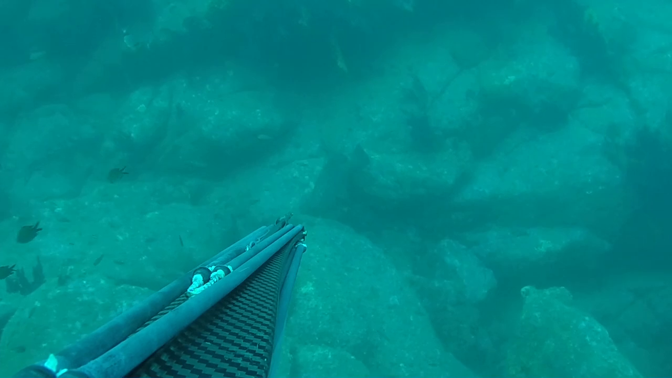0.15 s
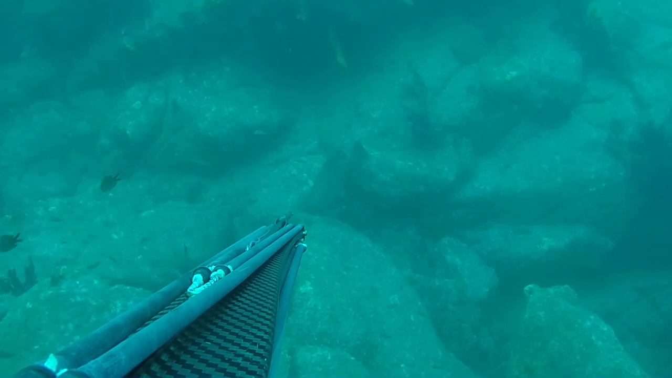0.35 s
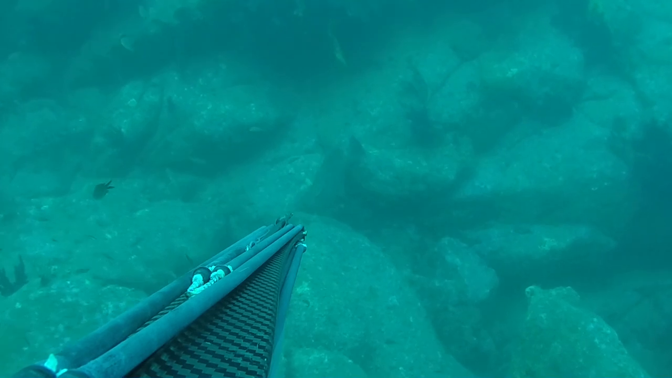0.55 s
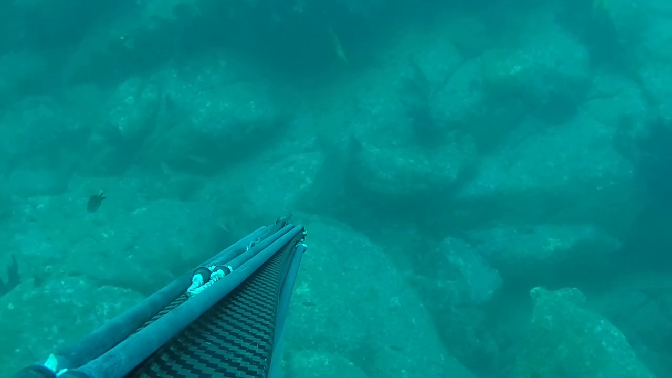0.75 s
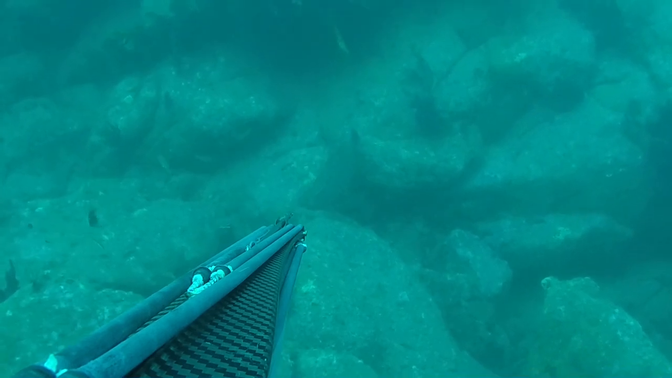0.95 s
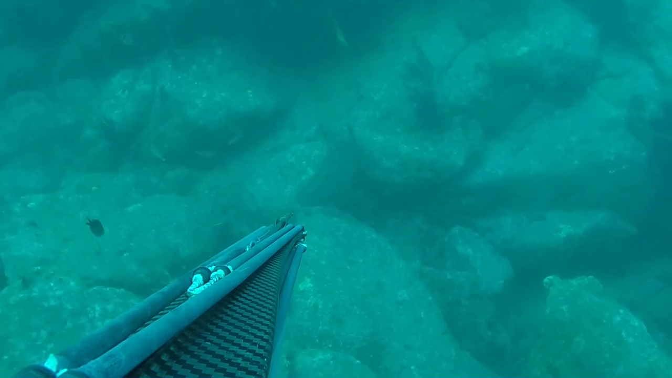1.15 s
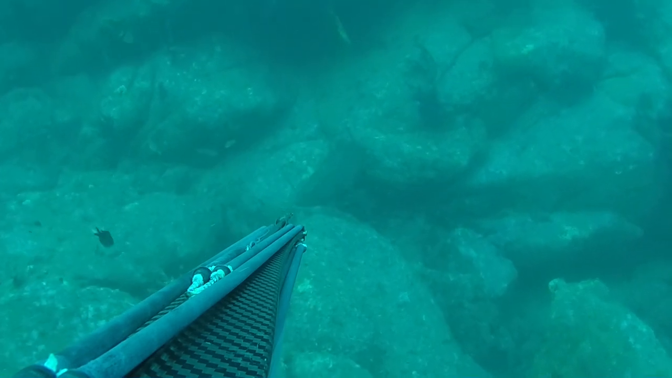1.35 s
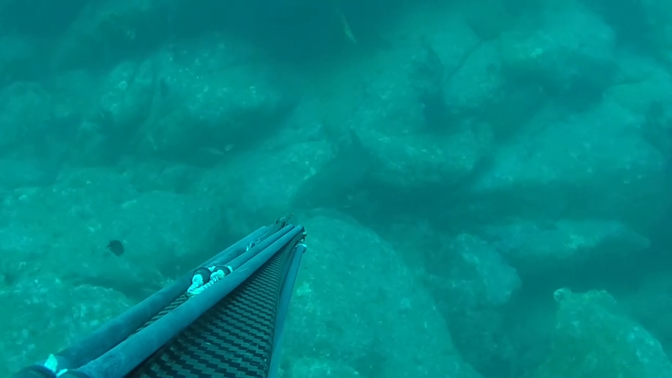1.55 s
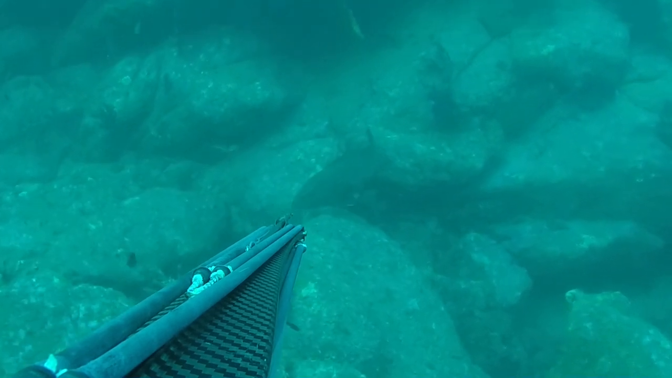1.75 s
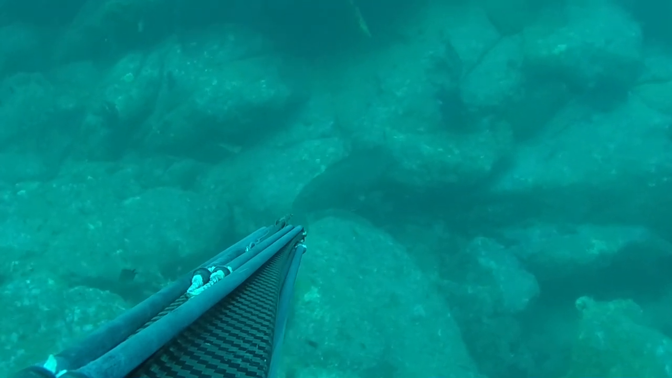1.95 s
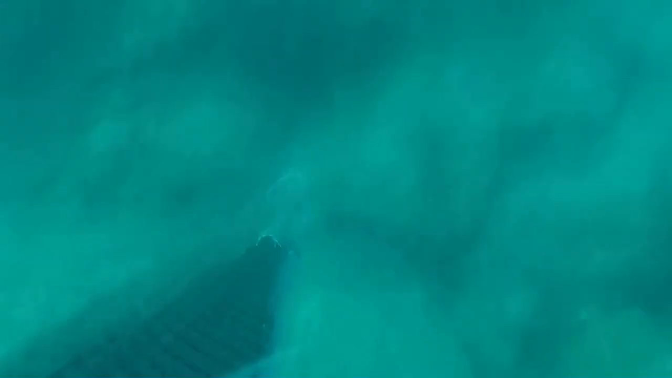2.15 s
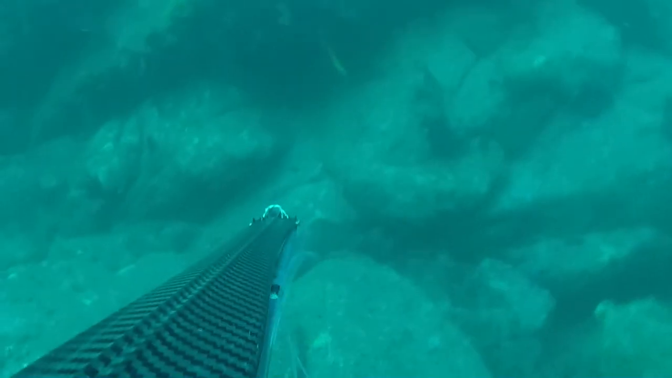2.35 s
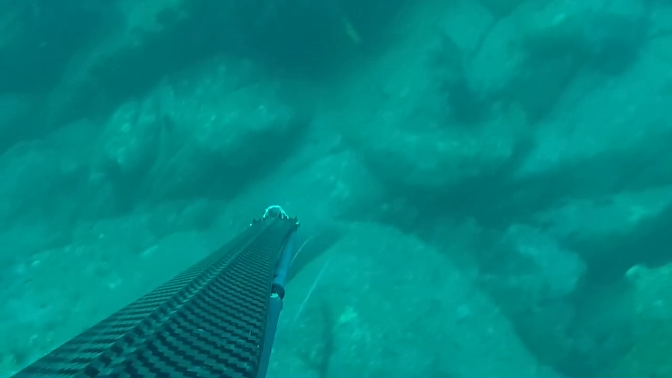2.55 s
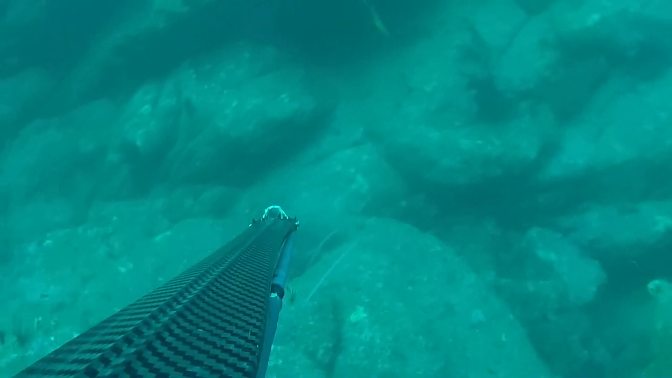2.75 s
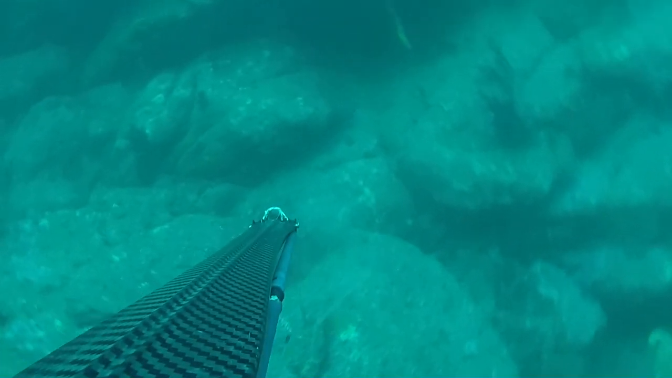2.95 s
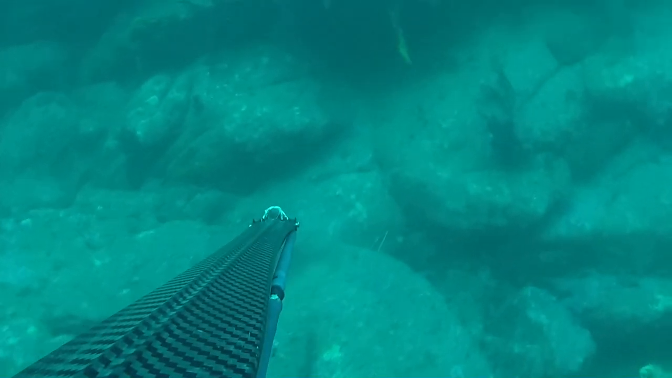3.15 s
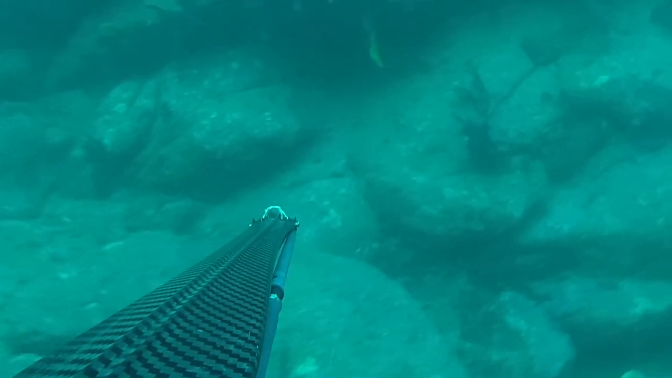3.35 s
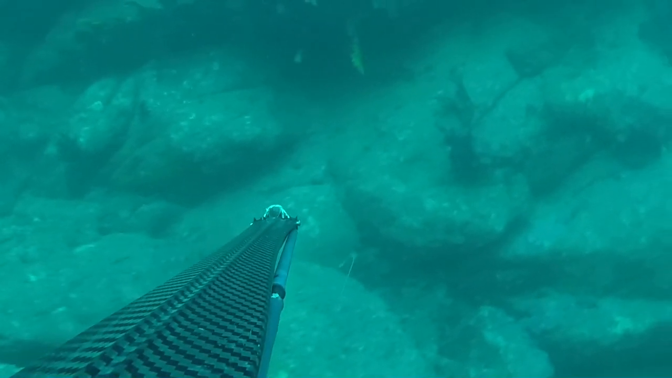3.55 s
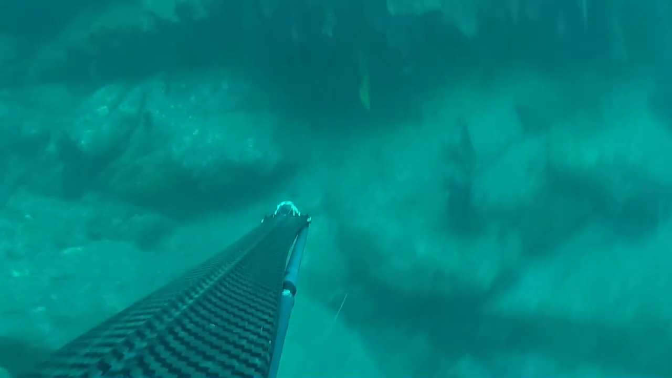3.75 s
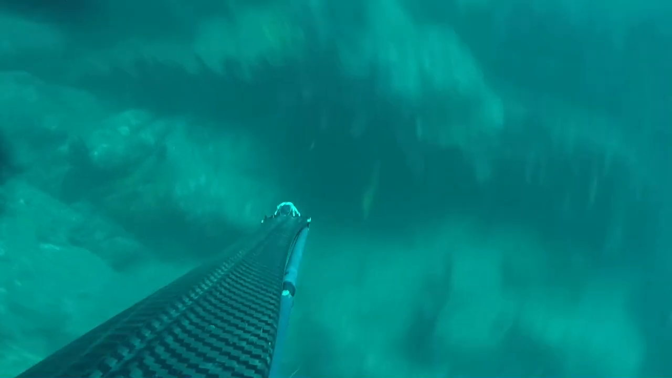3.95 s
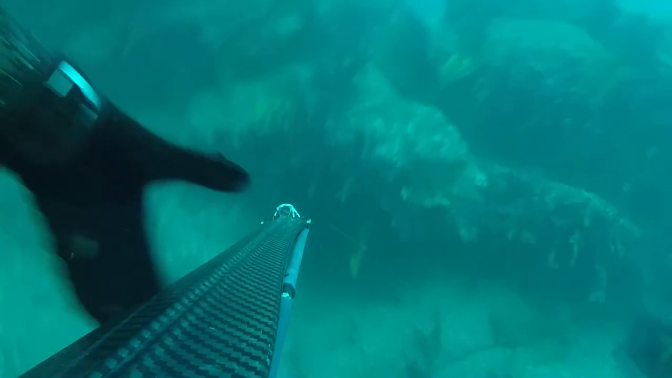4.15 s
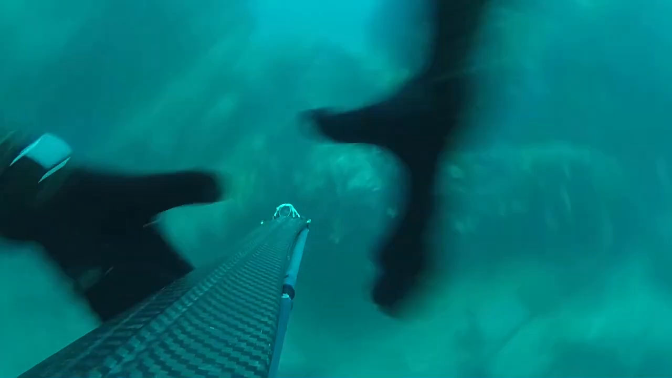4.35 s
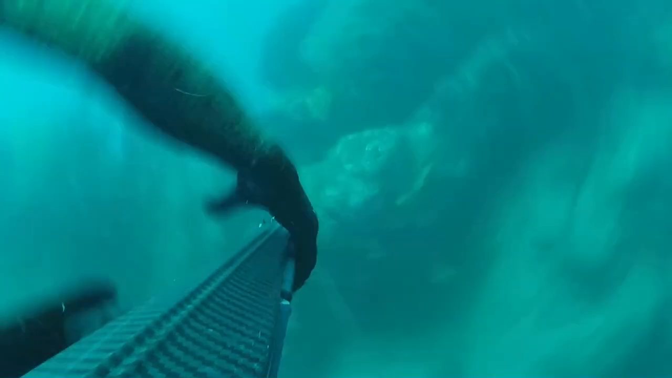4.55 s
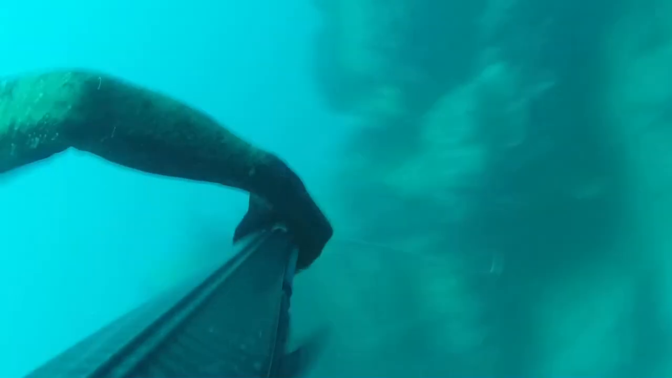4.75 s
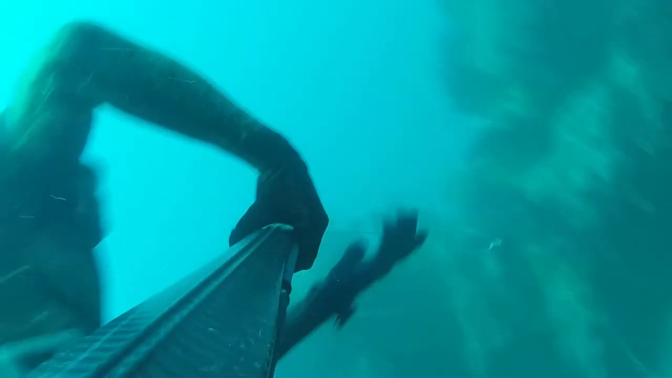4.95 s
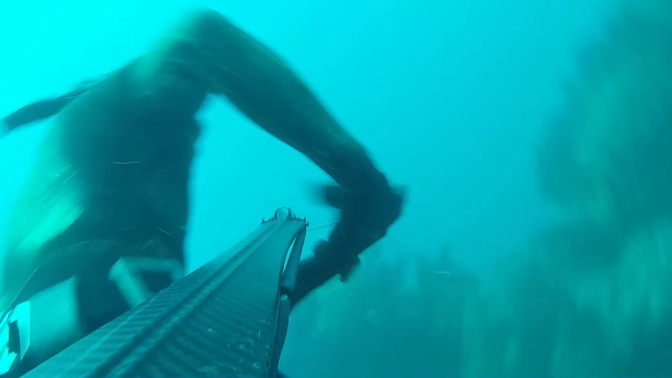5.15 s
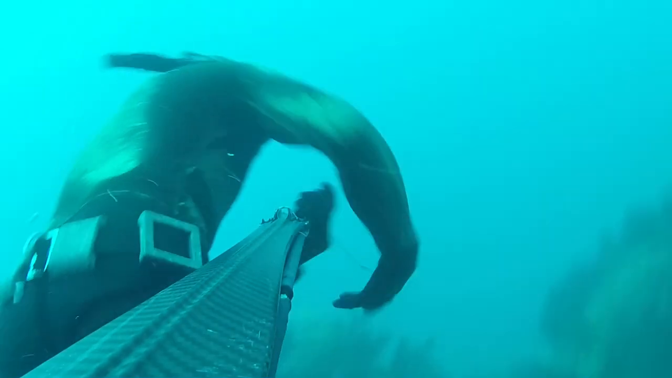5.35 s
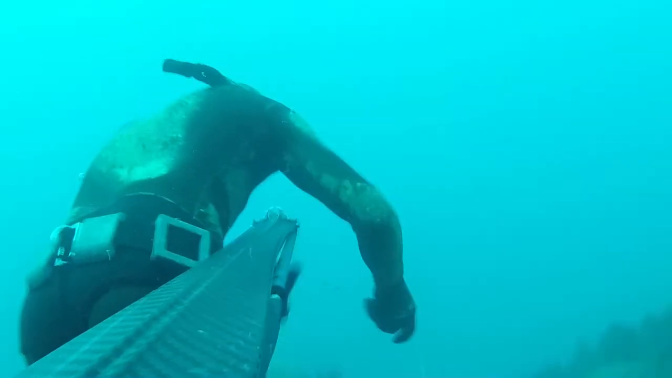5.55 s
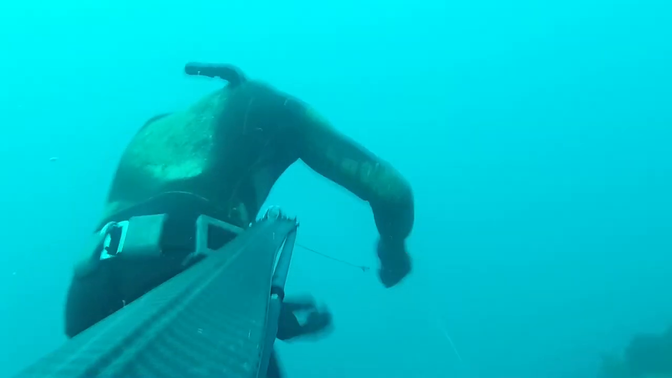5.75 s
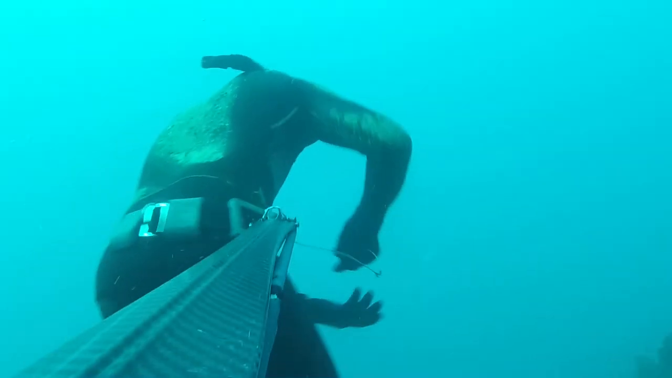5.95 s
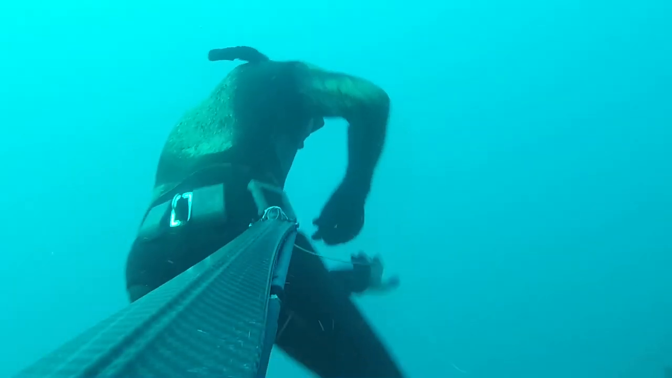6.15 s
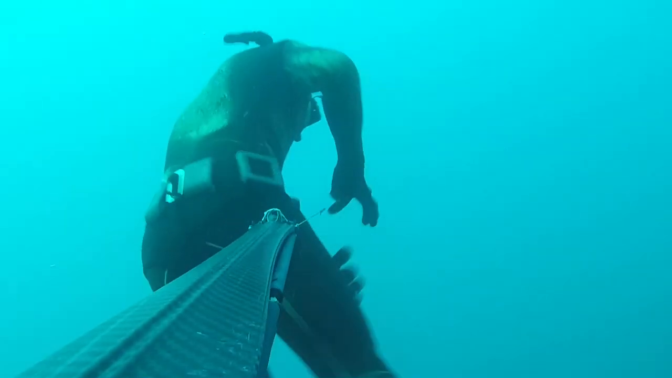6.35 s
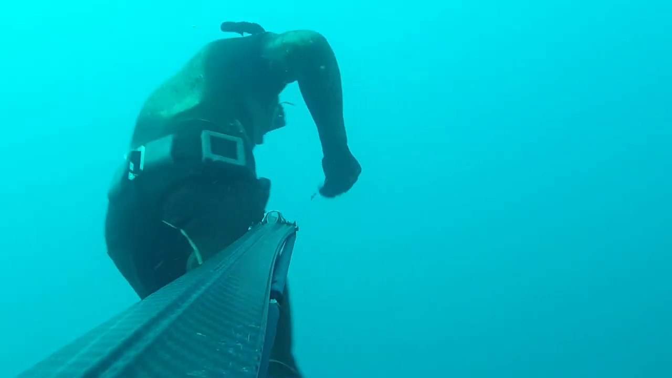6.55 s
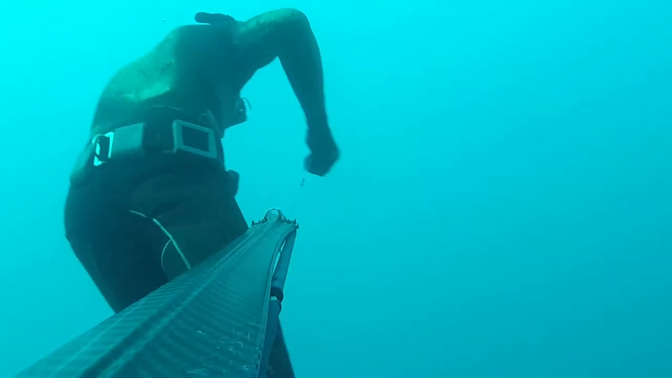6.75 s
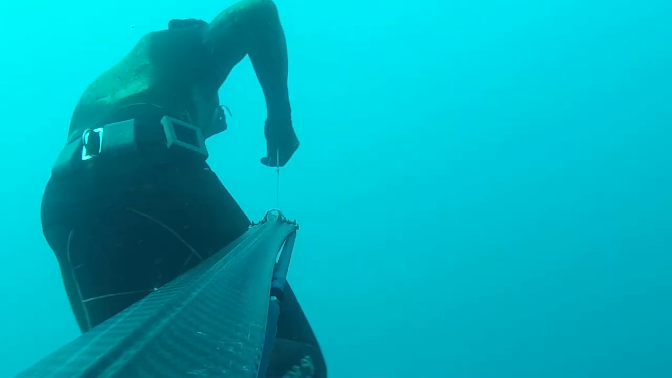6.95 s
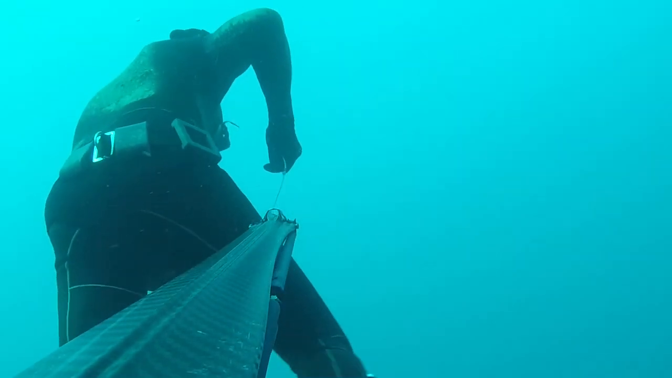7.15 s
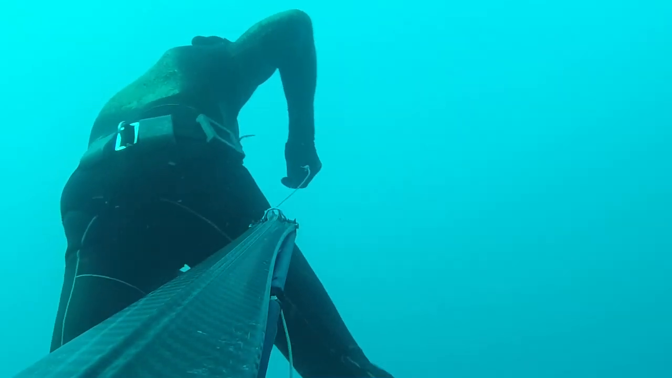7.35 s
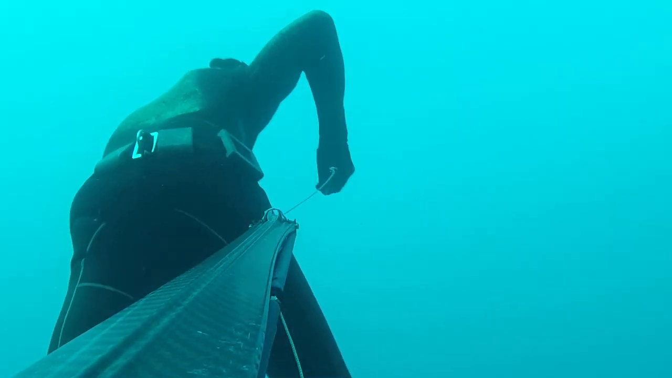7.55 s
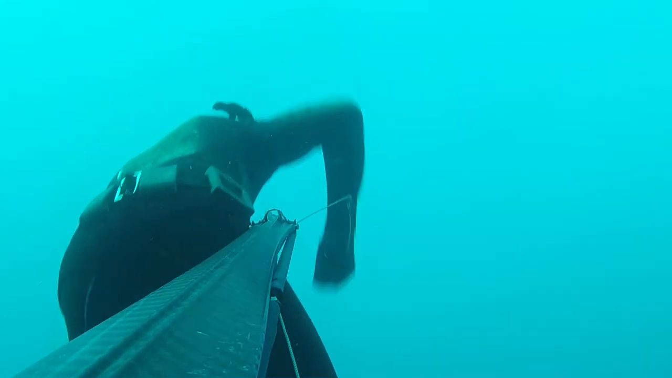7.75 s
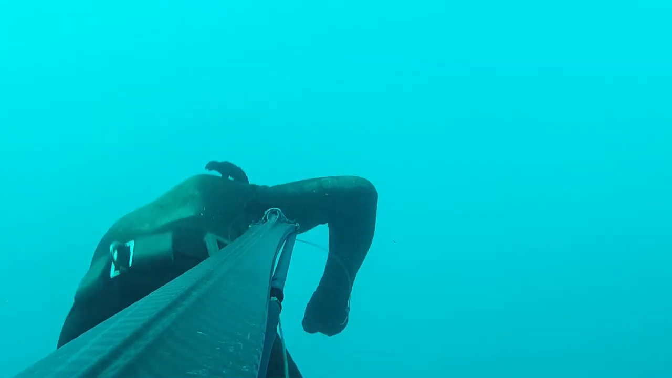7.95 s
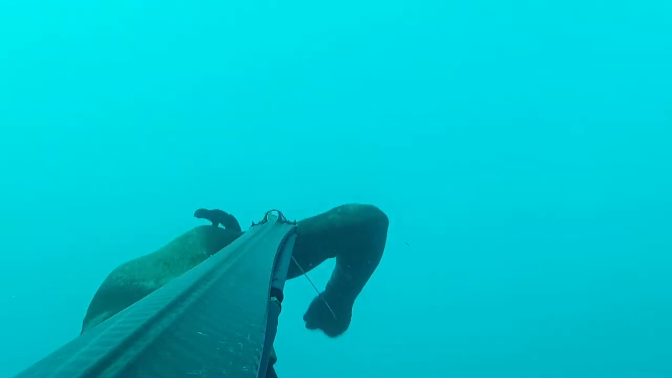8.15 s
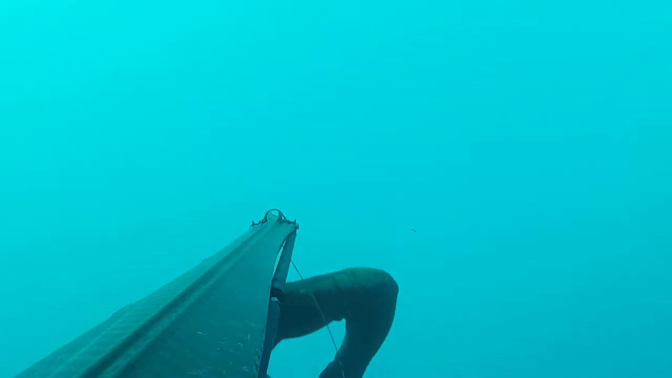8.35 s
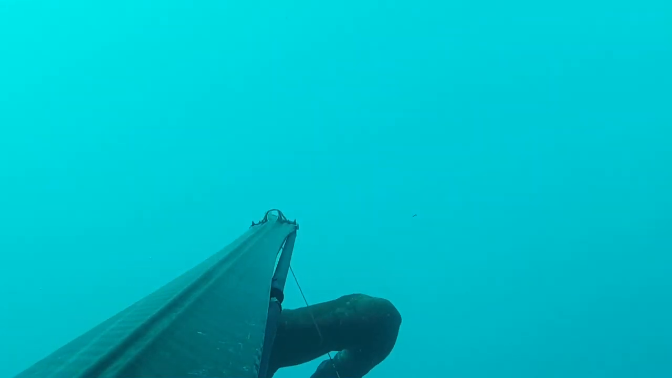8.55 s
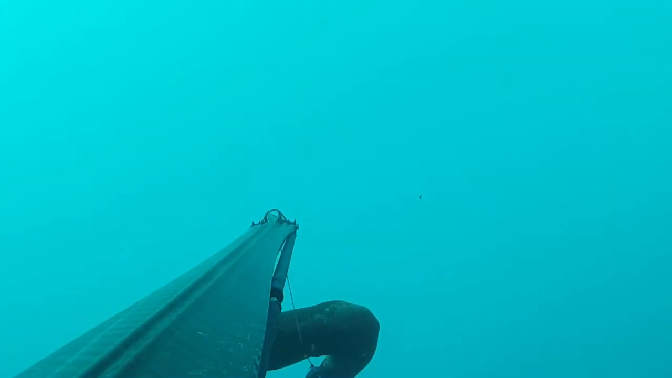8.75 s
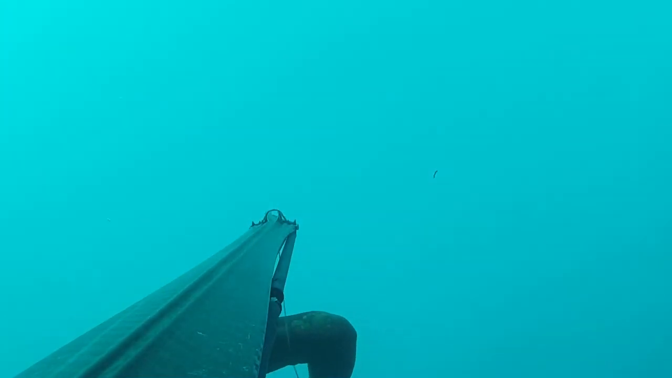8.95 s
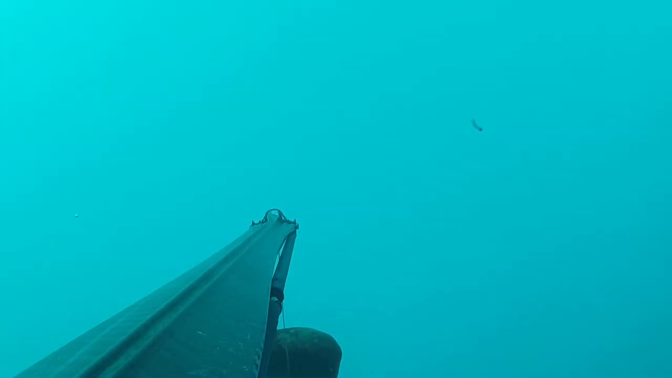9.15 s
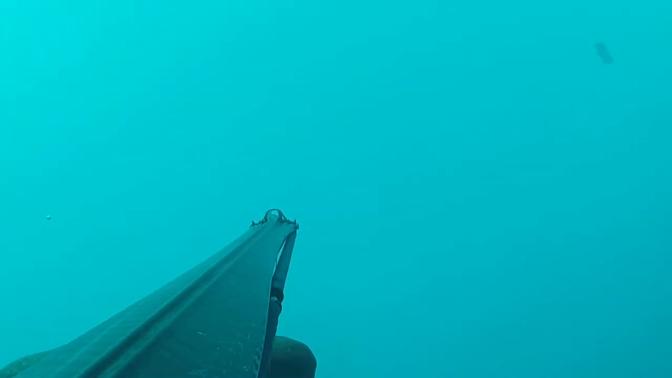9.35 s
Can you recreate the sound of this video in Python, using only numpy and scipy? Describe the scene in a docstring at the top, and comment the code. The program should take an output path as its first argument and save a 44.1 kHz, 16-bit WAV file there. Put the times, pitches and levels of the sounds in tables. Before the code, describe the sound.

Snapping shrimp tick over a dim sea; a sudden loud hard rattle of a speargun shot, then handling bumps, squeaks and watery rumbles.

```python
"""First the sea: hiss and far crackle, with snapping shrimp close by, over a rocky bottom. Then a speargun fires.
A microphone rides the gun in a camera's sealed housing. Trigger, shaft and line rattle the barrel; then hands
and reel line knock, rub, squeak and ratchet on it while it sways in the water. Blows and rubbing are noise
ringing resonances of barrel and housing; low wobbles and squeaks are short gliding sines. Gain control ducks
the far sea after loud near sounds."""
import sys
import numpy as np
from scipy import signal
from scipy.fft import rfft, irfft
from scipy.io import wavfile
from scipy.ndimage import uniform_filter1d

SR = 44100
rng = np.random.default_rng(int(sys.argv[2]) if len(sys.argv) > 2 else 0)


def inscribe(sig):
    """Save sig as 16-bit PCM at rate SR to the path in sys.argv[1].

    A 1-D sig is mono; a 2-D sig holds one channel per row.
    Samples are clipped to [-1, 1] before scaling.
    """
    pcm = np.round(np.clip(np.atleast_2d(sig).T, -1, 1) * 32767)
    wavfile.write(sys.argv[1], SR, pcm.astype(np.int16))


N = 414099
TIME = np.arange(N) / SR  # s

# Far sea, colour of hiss and crackle: (f/Hz, relative level/dB)
SEA_COLOUR = [(35, -54), (60, -3.5), (230, -6), (450, -9.5), (1000, -15), (1620, -18.5), (2100, -17.5),
              (2720, -21.5), (3590, -14.5), (5000, -25.5), (6000, -17.5), (7500, -23.5), (9400, -27.5),
              (10600, -35), (12000, -29.5), (14600, -37), (16000, -42.5)]
SEA_DB = -56.5  # rms before ducking

# Slow water pressure on housing and mount: (t/s, surge level/dB, mount level/dB)
SWAY = [(0.0, -79, -64), (0.15, -66.5, -68), (1.96, -60.5, -63), (2.07, -33.5, -47), (2.25, -35, -36.5),
        (2.32, -56.5, -46), (2.77, -67, -62), (3.61, -59.5, -55), (3.71, -37, -51), (4.24, -63.5, -63),
        (4.55, -52, -45), (4.92, -32.5, -48), (5.0, -47.5, -43.5), (5.46, -57, -52.5), (5.75, -33.5, -48.5),
        (6.04, -54.5, -67), (6.3, -62, -58), (6.59, -48.5, -62), (7.11, -64.5, -66), (8.18, -67, -63),
        (8.34, -45, -60), (8.86, -66.5, -66), (9.26, -49.5, -51.5), (9.39, -59, -59)]
# Flow bending the barrel: (t/s, level/dB)
FLOW = [(0.0, -67), (1.7, -69.5), (2.07, -67), (2.19, -59.5), (2.48, -67), (2.77, -61), (3.32, -53.5),
        (3.79, -47.5), (4.03, -58), (4.18, -62), (4.97, -42.5), (5.28, -50.5), (5.75, -50.5), (5.93, -59),
        (6.33, -50), (6.49, -58.5), (7.24, -53), (7.61, -59), (7.95, -54), (8.71, -60), (9.1, -55.5),
        (9.39, -58.5)]
GUST_DB = 2  # unevenness of the flow
BEND_DB = -5.5  # barrel bending against the thud of a stroke

# Shrimp snapping near the microphone: (t/s, peak clack level/dB, peak tick level/dB)
NEAR_SNAPS = [(0.0269, -50, -31.5), (0.0464, -37.5, -31.5), (0.1327, -43.0, -37), (0.4016, -55, -39),
              (0.7214, -36, -31), (0.9818, -35.5, -34), (1.1085, -49.0, -36.5), (1.2691, -39, -26.0),
              (1.7161, -43.0, -38), (1.7515, -39.5, -40), (1.8054, -42.0, -34.5), (1.8892, -51.0, -37.5),
              (2.3362, -35, -30), (2.3646, -44.0, -27.5), (2.3691, -37, -35), (3.0825, -45, -30.5),
              (3.6821, -33, -24.0), (3.729, -36.0, -32), (4.1351, -49, -42.5), (4.4449, -38.5, -39.5),
              (4.8954, -44.0, -39), (5.1702, -37.0, -34), (5.2042, -45, -25), (5.2431, -32.5, -32),
              (5.3444, -38, -32), (5.3548, -39, -33), (5.4536, -46.0, -32), (5.481, -34, -33.0),
              (6.0837, -39, -31.5), (6.4893, -57, -33), (6.6379, -64, -36), (6.9492, -38.5, -35),
              (7.2565, -50, -35.5), (7.2849, -39.5, -36.5), (7.7239, -42.0, -34), (7.8751, -49.0, -39.0),
              (8.0093, -49, -36.5), (8.3286, -52, -36.5), (8.6089, -54.0, -30), (8.7282, -41, -27),
              (9.1337, -48, -41), (9.1412, -41, -31.5), (9.255, -35.0, -35.0), (9.3772, -52, -38.5)]
FAINT_SNAPS = 16  # number, at random times
FAINT_SNAP_LOWEST_DB, FAINT_SNAP_RANGE_DB = -47, 11

# Resonances of housing and barrel, four groups, each: (f/Hz, width/Hz, relative level/dB)
BODY = [(940, 220, -0.5), (1241, 130, 2), (1355, 150, -1), (1630, 190, -1), (2005, 200, 3)]
THUD = [(303, 330, -4), (477, 135, 2.5), (805, 230, -3.5)]
CLACK = [(2227, 180, 2.5), (2552, 140, 2.5), (2748, 190, 0), (3475, 330, 1), (4350, 500, -6)]
TICK = [(5834, 670, 4.5), (6680, 860, -1.5), (6756, 200, 3), (7940, 700, -5.5), (9420, 1200, -13),
        (12470, 450, -17.5), (13700, 2000, -24)]

# Blows on barrel and housing, peak of each group; the place struck favours some body modes:
# (t/s, body level/dB, thud level/dB, clack level/dB, tick level/dB, favoured body f/Hz, contact/s)
KNOCKS = [(0.166, -58.0, -63.0, -42, -48, 1940.0, 0.0031), (0.86, -42.0, -66.0, -56, -57.0, 1700, 0.002),
          (1.4231, -29.5, -49, -35.5, -41, 1630, 0.0023), (1.6237, -42.0, -51, -45, -47, 1610, 0.0021),
          (1.6905, -49, -60, -34, -23.0, 1960.0, 0.0031), (1.8269, -32, -45.5, -39, -57.0, 1630, 0.00087),
          (2.041, -15, -26, -37, -50.0, 1810, 0.0014), (2.0463, -4, -11.5, -6.5, -10, 1410, 0.0013),
          (2.052, -19, -21, -19.0, -14.0, 1630.0, 0.00048), (2.0648, 1, -10, -2, -6, 1520, 0.0018),
          (2.068, 0, -18, -15, -3.5, 1480, 0.0011), (2.0775, -26, -43.0, -11.5, -9, 1770.0, 0.0011),
          (2.097, -20.0, -31.0, -23, -22, 1750.0, 0.0018), (2.1069, -8.0, -28, -13.5, -8.5, 1760, 0.0015),
          (2.118, -19, -20, -23, -35, 1650.0, 0.0018), (2.127, -24, -26.0, -21, -24, 1680.0, 0.0012),
          (2.1495, -24, -23, -25, -22, 1730.0, 0.00082), (2.1629, -18.0, -26, -27, -28.0, 1680.0, 0.0014),
          (2.1703, -14, -23, -15, -23, 1470.0, 0.0014), (2.193, -10.5, -29, -13, -21.5, 1480, 0.0032),
          (2.2192, -8, -19.0, -8.5, -18.0, 1890.0, 0.00062), (2.237, -19, -41, -21, -34, 1610, 0.0012),
          (2.2465, -17, -25, -16, -23, 1600.0, 0.0022), (2.2586, -5, -27, -2.0, -3.5, 1760.0, 0.0014),
          (2.273, -24, -23, -22, -25, 1580, 0.0023), (2.3833, -28.0, -31.0, -35, -56, 1850, 0.002),
          (2.4, -31.5, -55.0, -39, -44.5, 1820, 0.0023), (2.4395, -51, -60, -48, -45, 1900, 0.001),
          (2.4769, -44, -41.5, -59, -65.5, 1790.0, 0.0029), (2.57, -50, -52, -52, -55, 1592, 0.0015),
          (2.6533, -40, -56.5, -43, -40.5, 1254, 0.0033), (2.6824, -52, -56, -41, -50.5, 1285, 0.0025),
          (2.7376, -44, -63.5, -43.5, -67, 1840, 0.0015), (2.9386, -30.5, -43.5, -48, -44, 1200.0, 0.0029),
          (2.9442, -37, -51, -41, -45, 1150.0, 0.0031), (3.0224, -29.5, -29.5, -42, -58.0, 1520, 0.0026),
          (3.1924, -23.5, -25.5, -33, -60, 1600, 0.0019), (3.3866, -41.5, -44, -50, -40, 1640.0, 0.0014),
          (3.4342, -33.0, -54.0, -58, -53.0, 1080, 0.005), (3.4546, -28.0, -30, -40.0, -57, 1490, 0.0013),
          (3.5649, -43, -58, -37.5, -50, 1310, 0.002), (3.634, -40, -41, -41, -61, 1250, 0.0038),
          (3.6889, -7.0, -21, -9, -16.5, 1093, 0.0015), (3.7602, -36.5, -53.0, -46, -49, 1600.0, 0.0033),
          (3.85, -24, -51, -23, -44, 1480, 0.0017), (3.947, -40, -32.5, -38.0, -37, 1530.0, 0.0022),
          (4.013, -30, -44, -48, -41, 1280.0, 0.0015), (4.0281, -13, -32.0, 0, -6.5, 1530, 0.0014),
          (4.0365, -33, -31, -15.5, -23, 1420.0, 0.0016), (4.0417, -30.5, -38, -22, -37, 1843, 0.001),
          (4.3815, -42, -47.5, -57, -64.5, 1360.0, 0.003), (4.5711, -22, -36, -25.5, -35.5, 1430, 0.0017),
          (4.693, -28, -41.0, -29, -45, 1730.0, 0.0013), (4.7355, -13, -18.5, -10.5, -17.5, 1160, 0.0013),
          (4.7428, -14.5, -23.5, -20.5, -42, 1730, 0.0015), (4.866, -37.5, -50, -33.5, -37, 1460, 0.0036),
          (4.902, -42, -55, -34, -37, 1550.0, 0.0034), (4.9438, -36, -43.0, -27.5, -33.5, 1410, 0.0044),
          (4.9725, -43, -34, -34.5, -40, 1920.0, 0.012), (5.119, -34, -40.0, -36, -34.5, 1000, 0.0018),
          (5.3787, -35.0, -40, -48.0, -59, 1230, 0.0023), (5.491, -34, -46, -30, -30.5, 1770, 0.0064),
          (5.518, -34, -29.5, -36, -34, 1130, 0.0028), (5.6049, -29, -44.0, -38, -51, 1340.0, 0.0041),
          (5.931, -36.0, -36, -38.5, -50, 960.0, 0.0024), (6.058, -40.5, -40, -41, -67.5, 1470.0, 0.0027),
          (6.0996, -43.5, -53, -42.0, -39, 1820.0, 0.0031),
          (6.1454, -40, -42.0, -40.0, -49.0, 1260.0, 0.0023), (6.182, -37, -36, -29.5, -35, 1510.0, 0.0043),
          (6.213, -32.0, -35, -29, -29, 1830, 0.0024), (6.2566, -37, -37, -38, -48, 1960.0, 0.0029),
          (6.2807, -34.5, -33.5, -38.5, -58, 1130, 0.0043), (6.3213, -40, -45, -45, -54, 1900, 0.002),
          (6.4376, -25.0, -36.5, -46, -61.0, 1320, 0.0014), (6.5206, -42.5, -58, -40, -54, 1500, 0.002),
          (6.7063, -45, -61, -35.0, -50, 1670.0, 0.0028), (6.7762, -33.0, -39, -35.0, -53, 1980, 0.004),
          (6.8031, -35, -33, -33.5, -40.5, 1350.0, 0.006), (7.3356, -41.5, -36, -42.5, -58.5, 1195, 0.0015),
          (7.3797, -35, -32, -35, -46.0, 1130.0, 0.0023), (7.7, -35.5, -35.5, -36, -44.5, 1500.0, 0.0036),
          (7.7599, -35, -30.5, -40, -39.0, 1460.0, 0.0014), (7.895, -40, -32, -37, -36.5, 1320.0, 0.0029),
          (7.9776, -37, -32.5, -36, -36.5, 1450, 0.0031),
          (8.0486, -40, -32.0, -53.0, -54.0, 1010.0, 0.0026), (8.165, -43.0, -41, -47, -57.0, 1440, 0.0036),
          (8.267, -33.5, -33, -33.5, -52, 1600.0, 0.0021), (8.273, -29.5, -46, -37, -54, 1570, 0.0021),
          (8.3104, -38.0, -44.5, -38.5, -55, 1910.0, 0.003), (8.4852, -42.0, -66, -35.5, -65, 1960, 0.0014),
          (8.8703, -39, -47, -48, -49.5, 1290, 0.002), (8.8934, -40, -54, -34, -49.0, 1180.0, 0.0021),
          (9.01, -30.5, -29, -33, -53, 1810, 0.003)]
# Favoured clack pitch; it rises as the clack outweighs the body
CLACK_HZ, CLACK_HZ_PER_DB = 2800, 55.5
# A metal part ringing on after one clack: (f/Hz, starting level/dB, time to fall 60 dB/s)
PING = (2700, -45, 0.17)
PING_S = 4.034  # onset

# Short low wobbles of barrel and mount when nudged: (centre t/s, starting f/Hz, peak level/dB)
WOBBLES = [(0.25, 304, -50), (2.706, 115, -33.5), (3.345, 108, -35), (3.584, 113, -37.5), (3.632, 133, -35),
           (3.762, 103, -39), (3.966, 123, -33.5), (3.972, 230, -35), (4.248, 152.4, -39), (4.33, 430, -50),
           (4.537, 152, -28), (4.62, 380, -40.5), (4.587, 454, -36), (4.71, 397, -36.5), (4.719, 181, -41),
           (4.751, 245, -41), (4.835, 430, -40.5), (4.88, 423, -43), (4.886, 140.4, -30.5),
           (4.932, 405, -41), (4.979, 165, -26.5), (4.977, 255, -29.5), (5.054, 394, -34),
           (5.071, 167, -30), (5.087, 426, -29.5), (5.303, 157, -39.5), (5.348, 182, -41),
           (5.385, 162, -32.5), (5.5, 118, -34), (5.531, 233, -42.5), (5.607, 182, -34), (5.787, 146, -29),
           (5.844, 167, -28), (5.939, 166, -37), (6.133, 152, -32.5), (6.188, 230, -32),
           (6.222, 251, -32.5), (6.223, 143, -30), (6.286, 166, -34), (6.417, 413, -40), (6.425, 203, -37),
           (6.78, 158, -36), (6.812, 155, -34.5), (6.813, 240, -34.5), (6.857, 147, -32.5),
           (7.189, 219, -36.5), (7.346, 123, -43), (7.345, 245, -38.5), (7.387, 168, -31),
           (7.388, 252, -33), (7.418, 238, -30.5), (7.767, 138, -36), (7.905, 328.2, -36.5),
           (7.964, 243, -33.5), (8.169, 234, -44.5), (8.92, 334, -39), (8.925, 196, -36), (9.015, 157, -41)]
WOBBLE_S = 0.0354  # length scale

# Strokes of line and gloves along the barrel; levels during the hold:
# (t/s at full level, rise/s, hold/s, fall/s, body level/dB, thud level/dB, clack level/dB, tick level/dB,
#  favoured body f/Hz)
RUBS = [(2.048, 0.0087, .002, .025, -35.5, -22.5, -33, -50, 1489),
        (2.101, 0.048, .03, 0.045, -27, -35, -33.5, -40, 1690),
        (2.154, 0.036, .01, .04, -28.5, -34.5, -36, -36, 1670),
        (2.21, 0.041, 0.013, .05, -40.5, -36, -45, -52, 1740),
        (2.266, 0.025, .055, .05, -40.5, -44.5, -46.5, -43, 1680),
        (2.39, 0.14, .005, 0.055, -48.5, -51, -53, -60, 1764),
        (2.66, .15, .04, .05, -60.5, -73, -66.5, -75, 1220),
        (2.939, 0.055, .08, .12, -50.5, -57.5, -60, -66, 1150),
        (3.19, .14, .005, .2, -55.5, -51.5, -68.5, -66, 1610),
        (3.696, 0.017, .004, .03, -40.5, -34.5, -44, -53, 1152),
        (4.0, 0.25, 0.037, .02, -36.5, -43, -44.5, -59, 1500),
        (4.029, 0.018, 0.0069, .015, -24, -49, -37.5, -54, 1660),
        (4.563, 0.066, .07, .04, -51, -46.5, -68.5, -71, 1400),
        (4.734, 0.042, .01, .05, -42, -43, -46.5, -55, 1436),
        (4.868, 0.093, 0.018, 0.25, -44, -49, -47, -50, 1440),
        (5.071, .08, .01, .12, -52, -44.5, -52.5, -54, 1260),
        (5.164, 0.072, .01, .2, -48.5, -50, -51, -53, 1495),
        (5.357, 0.16, .005, 0.086, -51.5, -41, -47.5, -52, 1230),
        (5.495, 0.04, 0.016, 0.1, -43.5, -39.5, -43.5, -50, 1233),
        (5.594, .08, 0.19, .05, -52, -43, -53, -63, 1650),
        (5.827, 0.11, .03, 0.052, -41.5, -37, -42.5, -51, 1556),
        (5.943, 0.053, .005, .03, -43, -41, -50, -55, 888),
        (6.08, .04, .1, .05, -57, -46, -56.5, -61, 1200),
        (6.219, 0.056, .02, 0.065, -40.5, -40.5, -46.5, -53, 946),
        (6.322, .03, .005, .04, -45, -59, -71, -80, 1151),
        (6.376, 0.01, .03, 0.037, -37.5, -46.5, -55, -69, 1230),
        (6.418, .03, 0.022, 0.027, -33.5, -42.5, -51, -78, 1257),
        (6.804, 0.22, .05, 0.09, -48, -44.5, -45.5, -52.5, 1435),
        (7.139, .02, 0.078, 0.041, -54.5, -50, -51.5, -63, 1234),
        (7.379, 0.017, 0.039, 0.044, -42, -36, -48, -51, 1250),
        (7.709, .04, .005, .06, -54, -49.5, -56, -68, 1544),
        (7.762, 0.016, 0.0047, .04, -39, -44, -41.5, -45.5, 1305),
        (7.85, 0.049, .09, .12, -51.5, -48, -50, -55.5, 1316),
        (8.06, 0.027, 0.009, 0.11, -53.5, -52, -53, -56, 1093),
        (8.168, 0.026, .005, 0.063, -44, -40, -51, -59, 1102),
        (8.273, 0.12, 0.0056, 0.058, -52.5, -61, -46, -55, 1610),
        (8.56, .1, .2, .03, -60, -65.5, -56, -61.5, 1239),
        (8.888, 0.035, .04, 0.12, -49.5, -49.5, -52.5, -64, 1322),
        (9.02, 0.052, 0.0053, 0.069, -38, -39, -40, -50.5, 1330)]
RUB_SWING_DB = 25.5  # climb over the rise, drop over the fall
# Steady drag of the line between strokes: (t/s, body level/dB)
DRAG = [(2.02, -68.5), (2.5, -66), (2.9, -63), (3.1, -63.5), (3.3, -54.5), (3.7, -51), (4.04, -55.5),
        (4.055, -70.5), (4.5, -58.5), (4.9, -59.5), (5.4, -55.5), (5.9, -64.5), (6.5, -59), (7.0, -62),
        (7.7, -65), (8.3, -61), (8.77, -62.5), (8.82, -71.5), (9.1, -58), (9.39, -73)]
# Drag in body, thud, clack and tick: (level/dB against the body)
DRAG_GROUPS_DB = [0, -2, -3.5, -8.5]
DRAG_HZ = 1350  # favoured body pitch of the drag

# Short squeaks of the taut line: (centre t/s, starting f/Hz, peak level/dB)
SQUEAKS = [(2.657, 1243, -41.5), (2.728, 1226, -52), (2.946, 1124, -31.5), (2.975, 1127, -49),
           (5.122, 952, -37), (6.468, 1280, -36.5), (8.772, 2070, -45), (9.035, 1310, -45),
           (9.06, 1260, -45)]
SQUEAK_S = .013  # length scale

# Line slipping step by step over the reel; a run that ends before its start gives no blows:
# (first t/s, last t/s, period/s, body level/dB, thud level/dB, clack level/dB, tick level/dB,
#  favoured body f/Hz)
RATCHETS = [(5.663, 5.852, .0468, -16.5, -21.5, -22.5, -34, 1630),
            (5.636, 5.775, .0462, -25, -30, -30, -47, 1700),
            (7.127, 7.218, 0.018, -37.5, -43.5, -39.5, -47.5, 1240),
            (11, 8.77, 0.022, -45, -60, -46, -63, 1240)]
RATCHET_SCATTER_DB, RATCHET_JITTER = 1.5, .015  # jitter as a share of the period
RATCHET_CONTACT_S = .0016

TOP_HZ = 15600


def undb(db):
    """Decibels to gain."""
    return 10 ** (np.asarray(db) / 20)


def unit(x):
    """Scale to rms 1."""
    return x / np.sqrt(np.mean(x ** 2))


def ring(x, modes, favoured_hz=None, slope_db=0):
    """Resonant band-passes of alternating sign inside a steep band; slope is dB per octave off the favoured pitch."""
    y = 0
    for k, (hz, width, db) in enumerate(modes):
        octaves = 0 if favoured_hz is None else np.log2(hz / favoured_hz)
        gain = undb(db - slope_db * np.abs(octaves))
        resonance = signal.iirpeak(hz, hz / width, fs=SR)
        y = y + (-1) ** k * gain * signal.lfilter(*resonance, x)
    edges = 0.57 * modes[0][0], min(1.27 * modes[-1][0], .45 * SR)
    return signal.sosfilt(signal.butter(2, edges, "band", fs=SR, output="sos"), y)


def walk(rate):
    """Random levels held 1 / rate s and slewed twice; spread near 1."""
    k = int(SR / rate)
    held = np.repeat(rng.standard_normal(N // k + 1), k)
    return 1.81 * uniform_filter1d(uniform_filter1d(held, k), k)[:N]


def grit(rate, spread_db):
    """Random clicks of either sign, rate a second on average, most small and a few larger."""
    size = np.minimum(rng.exponential(size=N), 3.5)
    struck = rng.random(N) < rate / SR
    return struck * undb(spread_db * size) * rng.choice([-1., 1.], N)


def blows(times, peaks_db, contact, modes, favoured_hz=None, slope_db=24):
    """A hard first touch and a chatter dying with the contact time ring the modes to the given peak."""
    out, t = np.zeros(N + 2048), np.arange(2048) / SR
    contact = np.clip(contact, 1e-4, .01)[:, None]
    swell = 1 - np.exp(-t / (0.05 * contact))
    chatter = rng.standard_normal((len(times), 2048)) * swell * np.exp(-t / contact)
    chatter[:, 8] += 3.0  # the first touch
    for s, peak_db, rung in zip(times, peaks_db, ring(chatter, modes, favoured_hz, slope_db)):
        i = int(s * SR)
        out[i:i + 2048] += undb(peak_db) * rung / np.abs(rung).max()
    return out[:N]


def sea():
    """Far hiss plus the crackle of countless far shrimp, as random clicks, coloured by the housing."""
    hz = np.maximum(np.fft.rfftfreq(N, 1 / SR), 1)
    colour_hz, colour_db = np.transpose(SEA_COLOUR)
    colour = undb(np.interp(np.log(hz), np.log(colour_hz), colour_db))
    highpass = signal.butter(2, 2000, "high", fs=SR, output="sos")
    crackle = signal.sosfilt(highpass, unit(grit(500, 2.9)))
    hiss = undb(1.2 * walk(6)) * rng.standard_normal(N)
    source = hiss + 0.88 * undb(3.0 * walk(12)) * crackle
    return undb(SEA_DB) * unit(irfft(rfft(source) * colour, N))


def sway(thud):
    """Uneven flow shakes slow surges, soft mount and bending barrel; strokes bend the barrel too."""
    s, surge_db, mount_db = np.transpose(SWAY)
    flow_db = np.interp(TIME, *np.transpose(FLOW))
    levels = np.interp(TIME, s, surge_db), np.interp(TIME, s, mount_db), flow_db
    # surge, mount and barrel modes: (f/Hz, width/Hz, relative level/dB)
    springs = ([(22, 12, 1), (32.8, 12, -9.0)],
               [(49, 8.5, 2.5), (70.4, 22, -3)],
               [(111, 30, -0.5), (160.0, 35, -1.3), (231, 62, -2.2)])
    gains = [undb(level_db + GUST_DB * walk(11)) for level_db in levels]
    gains[2] = np.hypot(gains[2], undb(BEND_DB) * thud)
    return sum(gain * unit(ring(rng.standard_normal(N), modes)) for gain, modes in zip(gains, springs))


def snaps():
    """Collapsing bubbles: very short blows on the upper resonances; fainter ones fall at random."""
    when, clack, tick = rng.random((FAINT_SNAPS, 3)).T
    faint_clack_db = FAINT_SNAP_LOWEST_DB + FAINT_SNAP_RANGE_DB * clack
    faint_tick_db = FAINT_SNAP_LOWEST_DB + FAINT_SNAP_RANGE_DB * tick
    faint = np.transpose([when * (N - 1) / SR, faint_clack_db, faint_tick_db])
    s, clack_db, tick_db = np.vstack([NEAR_SNAPS, faint]).T
    short = np.full(len(s), .0005)
    return blows(s, clack_db, short, CLACK) + blows(s, tick_db, short, TICK)


def knocks():
    """Each blow, ratchet steps included, rings the four groups in its own proportion; one metal part pings."""
    rows = list(KNOCKS) + ratchets()
    s, body_db, thud_db, clack_db, tick_db, body_hz, contact = np.transpose(rows)
    clack_hz = CLACK_HZ + CLACK_HZ_PER_DB * (clack_db - body_db)
    clack_hz = np.clip(clack_hz, CLACK[0][0], CLACK[-2][0])
    hz, ping_db, t60 = PING
    age = np.maximum(TIME - PING_S, 0)
    ping = undb(ping_db - 60 * age / t60) * np.sin(2 * np.pi * hz * age)
    body = blows(s, body_db, contact, BODY, body_hz[:, None])
    thud = blows(s, thud_db, contact, THUD)
    clack = blows(s, clack_db, contact, CLACK, clack_hz[:, None], slope_db=15.5)
    tick = blows(s, tick_db, contact, TICK)
    return body + thud + ping + clack + tick


def wobbles(table, length):
    """A nudged barrel or taut line: a few cycles that swell fast, die slower and glide a little."""
    out, t = np.zeros(N), np.arange(int(3 * length * SR)) / SR
    u = t / (0.2 * length)
    envelope = u * np.exp(1 - u)  # peaks at 1
    for (s, hz, peak_db), (phase, glide) in zip(table, rng.random((len(table), 2))):
        i = int((s - 0.33 * length) * SR)
        cycles = hz * t * (1 + 0.077 * (glide - .5) * t / length)
        out[i:i + len(t)] += undb(peak_db) * envelope * np.sin(2 * np.pi * (phase + cycles))
    return out


def strokes():
    """Group gains and favoured pitch: each stroke climbs, holds and fades; its power adds to the drag."""
    t = TIME[::64]
    drag_db = np.interp(t, *np.transpose(DRAG), left=-120)
    power = undb(drag_db + np.array(DRAG_GROUPS_DB)[:, None]) ** 2
    pitch = DRAG_HZ * power[0]  # weighted by body power
    for s, rise, hold, fall, *levels, hz in RUBS:
        before = np.maximum(s - t, 0) / max(rise, 1e-3)
        after = np.maximum(t - s - hold, 0) / max(fall, 1e-3)
        part = undb(np.array(levels)[:, None] - RUB_SWING_DB * (before + after)) ** 2
        power, pitch = power + part, pitch + hz * part[0]
    gains = [np.interp(TIME, t, row) for row in np.sqrt(power)]
    return gains, np.interp(TIME, t, pitch / power[0])


def rubs(gains, body_hz):
    """Stick-slip: the same uneven clicks drive every group, bunched by a quick grip flicker, over a thin own hiss."""
    slips, grip, out = unit(grit(450, 3.)), walk(120), 0
    for gain, modes, hz in zip(gains, (BODY, THUD, CLACK, TICK), (body_hz, None, None, None)):
        fine_slips = unit(grit(900, 1.6))
        slip = slips + .5 * fine_slips + 0.67 * rng.standard_normal(N)
        flicker_db = 2.2 * grip + 1.2 * walk(60)
        out = out + gain * unit(ring(undb(flicker_db) * slip, modes, hz, slope_db=20))
    return out


def ratchets():
    """Line stepping over the reel: rows of blows for each run, a little uneven in time and strength."""
    rows = []
    for first, last, period, *levels, hz in RATCHETS:
        steps = np.arange(first, last + period / 2, period)
        for s, (late, strong) in zip(steps, rng.standard_normal((40, 2))):
            when = s + RATCHET_JITTER * period * late
            levels_db = np.array(levels) + RATCHET_SCATTER_DB * strong
            rows.append((when, *levels_db, hz, RATCHET_CONTACT_S))
    return rows


def ducking(heard, knee_db, depth, attack_s, release_s):
    """Gain control: loud sound pulls the gain down fast, further when blows follow each other; it creeps back."""
    blocks = np.abs(heard[:N // 64 * 64]).reshape(-1, 64).max(axis=1)
    over_db = np.maximum(20 * np.log10(blocks + 1e-9) - knee_db, 0)
    cut, step = np.zeros(len(over_db)), 64 / SR
    for i in range(1, len(cut)):
        lag = attack_s if over_db[i] > cut[i - 1] else release_s
        cut[i] = cut[i - 1] + (over_db[i] - cut[i - 1]) * min(step / lag, 1)
    return undb(-depth * np.interp(TIME, np.arange(len(cut)) * step, cut))


def scene():
    """Near sounds keep their set levels; the far, steady sea follows the gain they leave."""
    gains, body_hz = strokes()
    near = knocks() + snaps()
    near = near + wobbles(WOBBLES, WOBBLE_S) + wobbles(SQUEAKS, SQUEAK_S)
    near = near + rubs(gains, body_hz) + sway(thud=gains[1])
    gain = ducking(near, knee_db=-9, depth=2.2, attack_s=0.0049, release_s=0.66)
    return (near + sea() * gain)[None]


def record(dry):
    """Blows near full scale clip; a steep low-pass then cuts the top."""
    lowpass = signal.ellip(10, .5, 80, TOP_HZ, fs=SR, output="sos")
    return signal.sosfilt(lowpass, np.clip(dry, -.98, .98))


dry = scene()
out = record(dry)
inscribe(out)
```